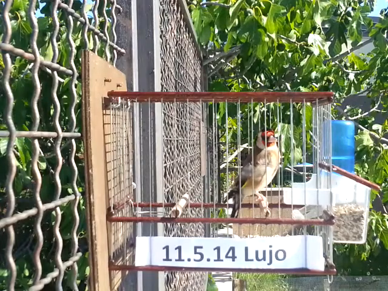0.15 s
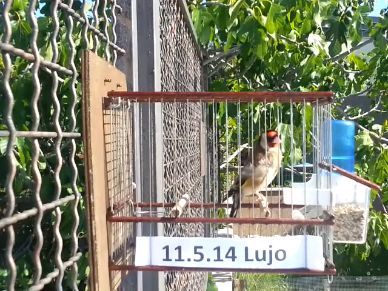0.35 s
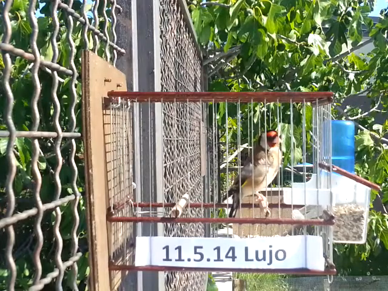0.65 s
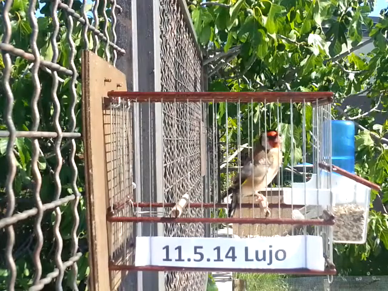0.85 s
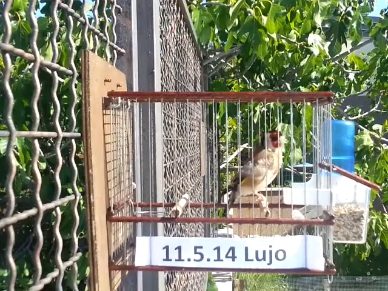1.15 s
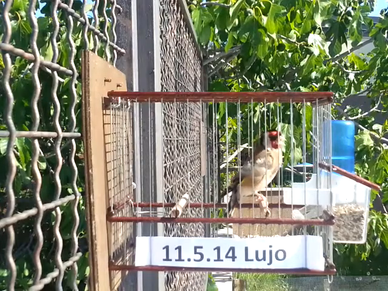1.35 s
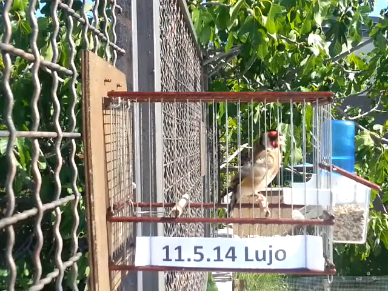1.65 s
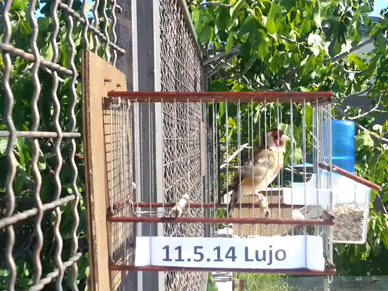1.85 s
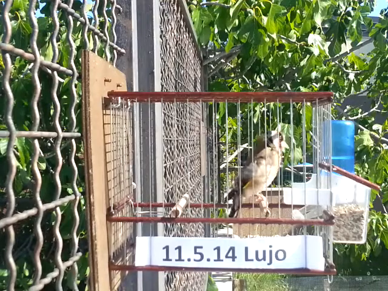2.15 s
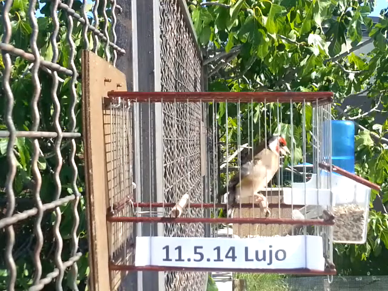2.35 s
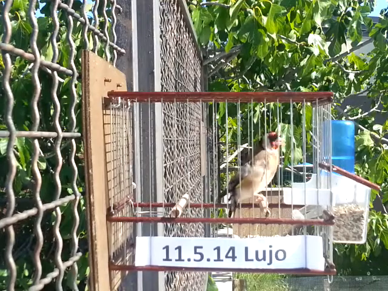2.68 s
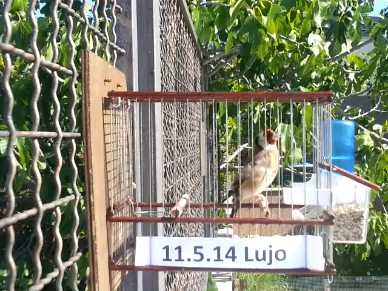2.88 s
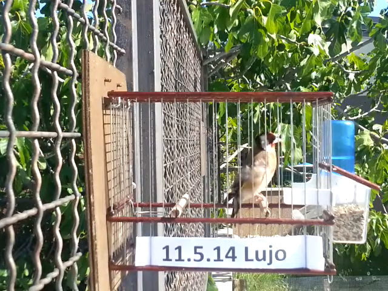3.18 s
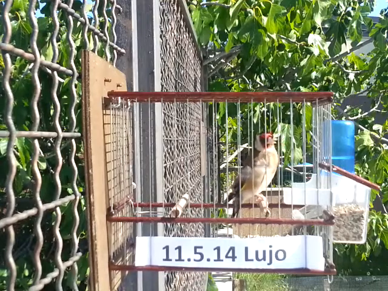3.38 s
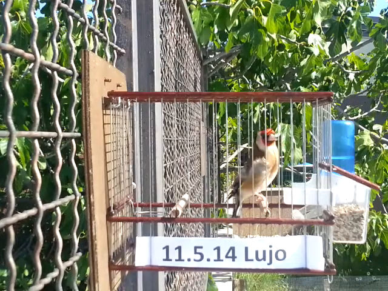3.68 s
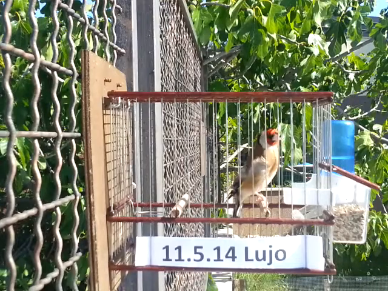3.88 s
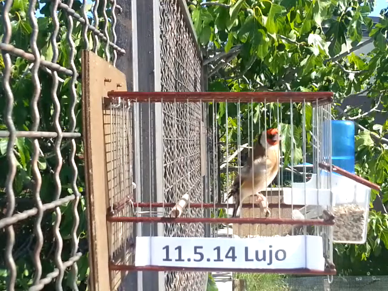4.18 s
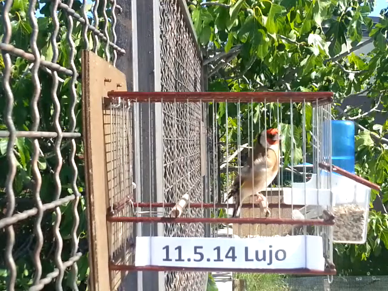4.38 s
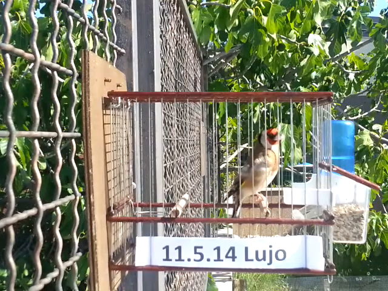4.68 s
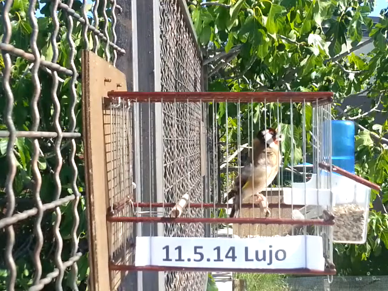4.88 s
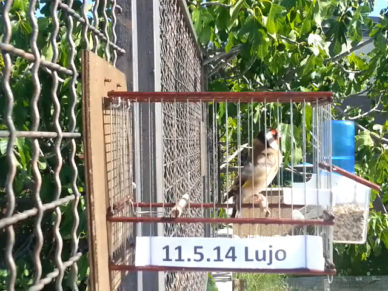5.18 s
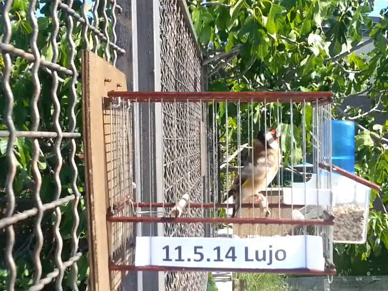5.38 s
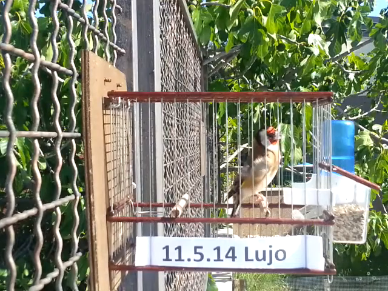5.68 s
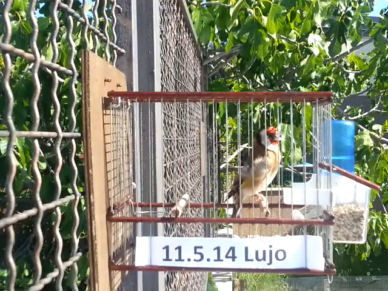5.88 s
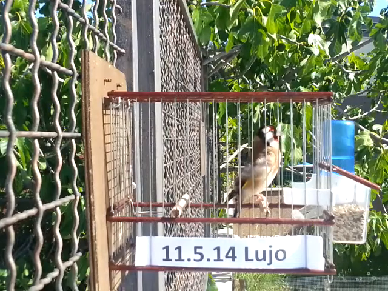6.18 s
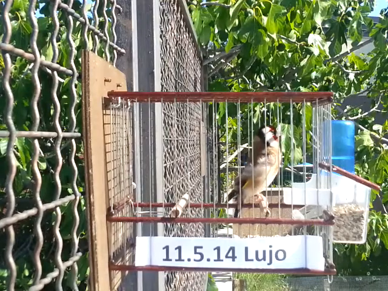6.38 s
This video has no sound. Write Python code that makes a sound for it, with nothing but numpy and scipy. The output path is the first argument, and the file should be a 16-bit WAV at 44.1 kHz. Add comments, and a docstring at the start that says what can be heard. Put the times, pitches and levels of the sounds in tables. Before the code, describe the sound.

Outdoors, quiet air with a rasping far bird call, then a loud near goldfinch bursts into clear, thin, very high notes, three motifs a second. It stops, leaving soft twitters, thin whistles and a faint throbbing trill from distant birds. A second similar phrase follows and runs to the cut. The close stereo pickup is bright, slightly hissy, with short reflections from wood, wire and fence.

```python
"""Caged goldfinch in a garden

A caged goldfinch close to a stereo microphone repeats a five-note motif in two phrases: gliding near sines
with weak overtones. Board, bars and fence return quick echoes, the yard a soft tail of decaying noise.
Further off are whistles, wheezes, a trill and chirps, made of wavering, shaken or throbbing sines, over a
low rumble and hiss made of noise bands, louder above the bass during the phrases."""
import sys
import numpy as np
from scipy import signal
from scipy.io import wavfile
from scipy.ndimage import uniform_filter1d

SR = 44100
rng = np.random.default_rng(int(sys.argv[2]) if len(sys.argv) > 2 else 0)


def int16_out(signal):
    """Quantize to a 16-bit WAV file."""
    q = np.round(np.clip(np.atleast_2d(signal).T, -1, 1) * 32767)
    wavfile.write(sys.argv[1], SR, q.astype(np.int16))


N = 288414
TIME = np.arange(N) / SR  # s

# song phrases, during which the background above the bass swells: (start [s], end [s])
PHRASES = [(.82, 2.86), (4.802, 6.6)]


def amp(db):
    """Gain of a level in dB."""
    return 10 ** (np.asarray(db) / 20)


def rms_one(x):
    """Scaled to rms 1."""
    return x / np.sqrt(np.mean(x ** 2) + 1e-20)


def sides(pan_db):
    """Left and right gains of a left-right balance in dB, total power kept."""
    ratio = amp(pan_db) ** 2
    return np.sqrt(2 * np.array([ratio, np.ones_like(ratio)]) / (1 + ratio))


def drift(per_s, size=N):
    """Random wander of rms 1: white noise through a double-pole lowpass at per_s Hz."""
    r = np.exp(-2 * np.pi * per_s / SR)
    noise = rng.standard_normal(size + SR // 2)
    wander = signal.lfilter([1], [1, -2 * r, r * r], noise)
    return rms_one(wander[SR // 2:])  # filter settled


def phase(hz):
    """Phase in radians of a varying pitch."""
    return 2 * np.pi * np.cumsum(hz) / SR


def add(out, x, s):
    """Mixes x into out from time s."""
    i = round(s * SR)
    out[:, i:i + x.shape[-1]] += x[..., :N - i]


def glide(start_ratio, settle_ms):
    """Pitch ratio that starts off its goal and closes in on it exponentially."""
    return lambda ms: 1 + (start_ratio - 1) * np.exp(-ms / settle_ms)


def arch(s, length_s, start_hz, middle_hz, end_hz, peak_db, edge_db):
    """Pitch on a parabola through three points; level swells and sinks by edge_db."""
    u = np.arange(0, 1, 1 / length_s / SR)
    hz = np.polyval(np.polyfit([0, .5, 1], [start_hz, middle_hz, end_hz], deg=2), u)
    return s, hz, peak_db + edge_db * (2 * u - 1) ** 2


def into_phrase(s):
    """Seconds since the phrase began."""
    (first, _), (second, _) = PHRASES
    return np.where(s < second - .1, s - first, s - second)


def background(level_db, patchy_db, bass_swell_db, middle_swell_db, treble_swell_db):
    """Low rumble and hiss in half-octave stereo noise bands, louder above the bass during the phrases."""
    # noise spectrum before level_db: (frequency [Hz], density [dB per Hz])
    air_table = [(25, -15), (49, -17.5), (162, -1), (900, -8), (1300, -10), (4080, -10.5), (6090, -20),
                 (13200, -17), (14700, -24.5)]
    # left-right correlation: (frequency [Hz], correlation [-1 to 1])
    likeness_table = [(60, 0.44), (370, 0.13), (2300, 0.03), (14200, 0.01002)]
    thin_line_hz, thin_line_db = 12750, -70  # faint steady hiss on one pitch

    def at_band(table, hz):
        table_hz, value = np.transpose(table)
        return np.interp(np.log(hz), np.log(table_hz), value)

    out, edges_hz = 0, 22 * 2 ** np.arange(0, 9.6, .5)
    white = rng.standard_normal((2, 2, N))
    singing = sum((TIME > start) * (TIME < end) * 1. for start, end in PHRASES)
    singing = uniform_filter1d(singing, size=6000, mode="nearest")
    flicker = [drift(6.0), drift(8.8), drift(5.1)]
    for k, (low_hz, high_hz) in enumerate(zip(edges_hz, edges_hz[1:])):
        band = signal.butter(2, [low_hz, high_hz], "band", fs=SR, output="sos")
        mid, side = signal.sosfilt(band, white[k % 2])
        hz = np.sqrt(low_hz * high_hz)
        alike = np.clip(at_band(likeness_table, hz), -1, 1)
        swell_db = bass_swell_db if hz < 230 else middle_swell_db if hz < 5000 else treble_swell_db
        gain = amp(at_band(air_table, hz) + swell_db * singing + patchy_db * flicker[k % 3])
        out = out + gain * (np.sqrt(1 + alike) * mid + np.sqrt(1 - alike) * side * [[1], [-1]])
    narrow = signal.butter(2, [thin_line_hz - 60, thin_line_hz + 60], "band", fs=SR, output="sos")
    thin = signal.sosfilt(narrow, white[0])
    return amp(level_db) * out + amp(thin_line_db) * rms_one(thin)


def wheezes(spread_hz, shakes_per_s, hiss_db):
    """A tone shaken so fast in pitch and level that it rasps, with fading breathy hiss above."""
    # calls: (time [s], length [s], centre at start [Hz], middle [Hz], end [Hz], peak level [dB])
    wheeze_table = [(.08, 0.36, 4200, 4260, 3460, -43), (3.25, 0.17, 4764, 4830, 4430, -56),
                    (3.86, 0.098, 3695, 3300, 2900, -58.5), (4.54, 0.17, 4340, 3900, 2867, -51),
                    (5.87, 0.21, 4346, 4000, 3760, -39.5)]
    out, above = np.zeros((2, N)), signal.butter(1, [6200, 9500], "band", fs=SR)
    for row in wheeze_table:
        s, hz, level_db = arch(*row, edge_db=-3.5)
        size = len(hz)
        u = np.linspace(0, 1, size)
        swell = np.sin(np.pi * u ** 0.92) ** 1.4
        beat = 0.18 + np.cos(2 * np.pi * 260 * TIME[:size])  # fast 260 Hz beating splits the tone into bands
        for side in out:
            turn = phase(hz + spread_hz * drift(250, size=size))
            rasp = amp(2.2 * drift(shakes_per_s, size=size)) * np.sin(turn) * beat
            breath = rms_one(signal.lfilter(*above, rng.standard_normal(size)))
            hiss = breath * amp(hiss_db) * (1 - u)
            add(side[None], (rms_one(rasp) + hiss) * amp(level_db) * swell, s)
    return out


def yard(x, leaves_db, leaves_t60_s, walls_db, walls_t60_s):
    """Scatter from leaves dies fast, the duller tail between walls lasts longer; sides are independent."""
    walls_top_hz = 5800  # the long way through the air takes the top
    t = TIME[:SR]
    lumps = np.clip(t / 0.016, 0, 1) * amp(3.9 * drift(55, size=SR))  # trees and sheds stand unevenly
    leaves, walls = rng.standard_normal((2, 2, SR)) * lumps
    leaves_band = signal.butter(1, [4300, 7000], "band", fs=SR)
    leaves = signal.lfilter(*leaves_band, leaves * amp(leaves_db - 60 * t / leaves_t60_s))
    walls_low = signal.butter(4, walls_top_hz, fs=SR, output="sos")
    walls = signal.sosfilt(walls_low, walls * amp(walls_db - 60 * t / walls_t60_s))
    stir = 1 + .6 * np.array([drift(70), drift(70)])  # moving leaves shake the tail
    return stir * signal.fftconvolve(x.mean(axis=0)[None], leaves + walls)[:, :N]


def whistles():
    """Thin wavering tones, some gliding, some nearly steady."""
    # short whistles: (time [s], length [s], pitch at start [Hz], middle [Hz], end [Hz],
    # peak level [dB], flutter [dB])
    short_table = [(.96, 0.12, 2360, 2180, 2050, -50, 3.8), (1.675, 0.055, 3550, 3169, 2950, -45, 4.6),
                   (2.0, 0.05, 2845, 3180, 4000, -44.5, 2), (2.65, 0.05, 2900, 3590, 4200, -43, 2),
                   (3.6, 0.15, 1637, 1585, 1525, -62, 3), (3.63, 0.18, 4575, 4510, 4579, -62, 2),
                   (3.75, 1.03, 4194, 4247, 4270, -66.5, 2.3), (4.26, 0.37, 5564, 5566, 5475, -62.5, 3),
                   (4.28, 0.23, 7480, 7500, 7580, -66, 3), (4.28, 0.24, 844, 856, 853, -61.5, 4),
                   (5.61, 0.096, 2600, 2094, 2030, -45.5, 5.43), (5.69, 0.12, 1950, 2020, 2310, -45.5, 2.6),
                   (5.8, 0.23, 1805, 1810, 1840, -50, 6.7), (6.06, 0.14, 2060, 1996, 1890, -52.5, 4.1),
                   (6.108, 0.13, 2114, 2494, 2320, -43.5, 3.8),
                   (6.24, 0.055, 1990, 2130, 1850, -44.5, 3.67), (6.27, 0.15, 2910, 3336, 3330, -45.5, 5.1),
                   (6.37, 0.11, 1915, 2375, 2420, -50, 4.2)]
    # three long whistles, a faint one that rises then sinks and two that fall;
    # each a list of points: (time [s], pitch [Hz], level [dB])
    long_table = [
        [(.15, 2330, -57), (.21, 2620, -58.5), (.46, 2290, -60.5), (.76, 2113, -64)],
        [(.72, 4266, -55), (.8, 3981, -33), (.95, 3420, -36.5), (1.1, 2797, -36.5), (1.17, 2483, -45.5),
         (1.27, 2393, -46.5), (1.36, 2057, -51.5), (1.42, 2060, -62)],
        [(4.82, 4380, -57), (4.86, 4210, -33.5), (4.93, 3840, -34), (5.0, 3165, -41.5), (5.2, 2625, -45),
         (5.33, 2255, -44.5), (5.5, 2104, -59)],
    ]
    calls = [(*arch(*row, edge_db=-7), flutter_db) for *row, flutter_db in short_table]
    for s, hz, level_db in map(np.transpose, long_table):
        t = np.arange(s[0], s[-1], 1 / SR)
        calls.append((s[0], np.interp(t, s, hz), np.interp(t, s, level_db), 2.0))
    out = np.zeros((2, N))
    for s, hz, level_db, flutter_db in calls:
        size = len(hz)
        turn = phase(hz + 6.0 * flutter_db * drift(80, size=size))
        waver_db = 0.8 * np.array([drift(25, size=size), drift(25, size=size)])
        waver_db = waver_db + flutter_db * np.minimum(drift(45, size=size), 1)
        fundamental = np.sin(turn + [[0], [rng.normal(0, 1)]])
        overtone_gain = amp(-24.0) * (hz / 4200) ** 6.0 * (hz < 4400)  # fades as the pitch falls
        tone = fundamental + overtone_gain * np.sin(2 * turn)
        ends = signal.windows.tukey(size, .1)
        add(out, tone * np.sqrt(2) * amp(level_db + waver_db) * ends, s)
    return out


def notes(rows, tune, attack_ms, attack_power, release_ms, release_power, second_db, lead_rad,
          overtone_lead_rad, swing_db, opens_db=-40, third_db=-90, tremor_hz=34, breath_db=-29.0,
          overtone_power=.61):
    """One note kind: a near sine from the syrinx swells, holds and dies, with overtones, breath and tremor."""
    out = np.zeros((2, N))
    lead, overtone_lead = np.array([[lead_rad], [0]]), np.array([[overtone_lead_rad], [0]])  # left vs right
    for s, peak_db, hz, pan_db, hold_ms, stretch in zip(*np.broadcast_arrays(*rows)):
        length_ms = attack_ms + hold_ms + release_ms
        ms = np.arange(-2, length_ms + 2, 1000 / SR / stretch)  # note time before stretching
        size = len(ms)
        pitch_hz = hz * tune(ms) + tremor_hz * drift(270, size=size)
        turn = phase(uniform_filter1d(pitch_hz, size=40))
        attack = np.clip(ms / attack_ms, 0, 1) ** attack_power
        attack = np.maximum(attack, amp(opens_db) * (ms > 0))  # the voice sets in with a small step
        release = 1 - np.clip((ms - attack_ms - hold_ms) / release_ms, 0, 1) ** release_power
        swell = uniform_filter1d(attack * release, size=60).clip(0)
        breath = amp(breath_db) * np.array([drift(900, size=size), drift(650, size=size)])
        balance = sides(pan_db + swing_db * (ms / length_ms - .5))
        tone = (1 + breath) * np.sin(turn + lead) * balance
        second = amp(second_db) * np.sin(2 * turn + overtone_lead)
        third = amp(third_db) * np.sin(3 * turn + overtone_lead)
        hiss = amp(-44.0) * rng.standard_normal((2, size))
        note = (tone + hiss) * swell + (second + third) * swell ** overtone_power
        add(out, amp(peak_db) * note, s + ms[0] * stretch / 1000)
    return out


def goldfinch():
    """The motif: rise, then a quick run of soft rise, chip and dip, then pipe; the singer tires."""
    # rising note that opens each motif: (time [s], peak level [dB], left-right balance [dB])
    rise_table = [(0.8285, -4, 6.5), (1.154, -1, 8), (1.483, -0.5, 7), (1.817, -1.5, 7), (2.1584, -5, 10),
                  (2.5098, -3, 7.5), (4.7933, -4, 6.5), (5.1213, -3, 6.5), (5.4594, -3, 7),
                  (5.796, 0.15, 7), (6.135, -1, 10.5), (6.4946, -3.5, 8.5)]
    # quick runs: (chip time [s], chip peak [dB], dip peak [dB], dip pitch [Hz], dip hold [ms],
    # dip left-right balance [dB])
    run_table = [(0.9396, -7, -3.5, 6805, 5, -5.5), (1.2696, -6, -3, 7000, 14.2, -7),
                 (1.5975, -5.5, -3.5, 6914, 16, -6.5), (1.9357, -6, -5, 6980, 15.4, -8),
                 (2.2833, -8.5, -5.5, 6906, 13.7, -3), (2.6351, -5, -3, 6686, 12.5, 5),
                 (4.905, -9.5, -6.5, 7085, 11.5, -7.5), (5.2402, -8, -5, 6990, 15, -6.5),
                 (5.574, -8, -4.5, 6785, 14, -5), (5.9144, -6.5, -2.5, 6820, 13.2, -3),
                 (6.2563, -8, -6, 6850, 14.4, -5.5)]
    # steady closing note: (time [s], peak level [dB], pitch [Hz], left-right balance [dB], hold [ms])
    pipe_table = [(1.0545, -3, 5550, 5, 2.3), (1.3833, -3, 5590, 8, 3), (1.7124, -3.5, 5512, 0.8, 3.5),
                  (2.051, -5, 5510, 4, 4.5), (2.403, -5.5, 5520, 6.5, 4.4), (2.759, -5, 5458, 8, 2.8),
                  (5.02, -4, 5585, 6, 0.58), (5.3561, -8, 5537, 2.5, 5.9), (5.6918, -4, 5536, 4.5, 6.2),
                  (6.0321, -4.5, 5444, 2, 7.1), (6.376, -7, 5473, 5, 6.3)]
    # tune of the dip, cut short by a short note: (time [ms], pitch ratio [1])
    dip_tune = [(0.5, 1.05), (2.55, 1.098), (4.5, 1.035), (11.5, 1.0), (18, 0.965), (23.5, 1.01),
                (27, 1.075), (30, 1.085)]
    rise_hz, soft_rise_hz, chip_hz = 4285, 3520, 5327  # glide goals at phrase start
    soft_before_chip_ms, dip_after_chip_ms = 35.2, 32.2  # gaps at phrase start
    gaps_grow_per_s, rise_grows_per_s, pitch_sag_per_s = 0.016, 0.025, 0.02  # shares per second of phrase

    rise_s, rise_db, rise_pan_db = np.transpose(rise_table)
    chip_s, chip_db, dip_db, dip_hz, dip_hold_ms, dip_pan_db = np.transpose(run_table)
    pipe_s, pipe_db, pipe_hz, pipe_pan_db, pipe_hold_ms = np.transpose(pipe_table)
    s_per_gap_ms = (1 + gaps_grow_per_s * into_phrase(chip_s)) / 1000
    rise_sag, run_sag = (1 - pitch_sag_per_s * into_phrase(s) for s in (rise_s, chip_s))
    rise_stretch = 1 + rise_grows_per_s * into_phrase(rise_s)

    # rows: (s, peak dB, Hz, left-right dB, hold ms, stretch)
    rises = notes((rise_s, rise_db, rise_hz * rise_sag, rise_pan_db, .6, rise_stretch),
                  glide(0.73, settle_ms=18.1), opens_db=-23, breath_db=-36.5,
                  attack_ms=12.9, attack_power=0.9, release_ms=17.5, release_power=0.64,
                  second_db=-35.0, third_db=-41.5, lead_rad=0.44, overtone_lead_rad=0.63, swing_db=0.5)
    soft_s = chip_s - soft_before_chip_ms * s_per_gap_ms
    soft_rises = notes((soft_s, -20, soft_rise_hz * run_sag, 9.5, .8, 1),
                       glide(0.63, settle_ms=21), overtone_power=1.2,
                       attack_ms=9.5, attack_power=0.66, release_ms=16, release_power=0.72,
                       second_db=-17.5, third_db=-32.0, lead_rad=0.89, overtone_lead_rad=.4, swing_db=-5.0)
    chips = notes((chip_s, chip_db, chip_hz * run_sag, 9.5, 5.0, 1),
                  glide(0.91, settle_ms=4.0), tremor_hz=110, breath_db=-29.0, opens_db=-18.5,
                  attack_ms=5.8, attack_power=0.5, release_ms=10.5, release_power=0.82,
                  second_db=-28.0, lead_rad=-0.23, overtone_lead_rad=1.79, swing_db=-4.5)
    # the chip trails off in a rasp
    rasps = notes((chip_s + .0165, chip_db - 20.0, chip_hz * run_sag, 9.5, 6, 1),
                  glide(0.98, settle_ms=1), tremor_hz=219, breath_db=-6.5,
                  attack_ms=1.8, attack_power=0.96, release_ms=7, release_power=1.5,
                  second_db=-32.5, lead_rad=-0.23, overtone_lead_rad=1.9, swing_db=1.5)
    dip_s = chip_s + dip_after_chip_ms * s_per_gap_ms
    dips = notes((dip_s, dip_db, dip_hz, dip_pan_db, dip_hold_ms, 1),
                 lambda ms: np.interp(ms, *np.transpose(dip_tune)), tremor_hz=60, breath_db=-36.5,
                 attack_ms=8, attack_power=1.0, release_ms=11.0, release_power=0.97,
                 second_db=-27.5, lead_rad=-.1, overtone_lead_rad=1.7, swing_db=-1.0)
    pipes = notes((pipe_s, pipe_db, pipe_hz, pipe_pan_db, pipe_hold_ms, 1),
                  glide(1.09, settle_ms=7.2), opens_db=-21.0,
                  attack_ms=17.8, attack_power=2.0, release_ms=18.5, release_power=2.1,
                  second_db=-27, lead_rad=-0.18, overtone_lead_rad=1.2, swing_db=-12)
    return rises + soft_rises + chips + rasps + dips + pipes


def near_echoes(x):
    """A few hard surfaces within metres send the song back."""
    # echoes from board, bars and fence: (delay [ms], left level [dB], right level [dB])
    echo_table = [(3.1, -20, -22.5), (6.3, -20, -16.5), (10.5, -22.5, -21), (14.7, -28, -29.5)]
    out = np.zeros((2, N))
    dulled = signal.lfilter(*signal.butter(2, 5500, fs=SR), x.mean(axis=0))  # wood and wire dull the top
    for ms, left_db, right_db in echo_table:
        add(out, amp([[left_db], [right_db]]) * dulled, ms / 1000)
    return out


def chirps(twitter_ms, glide_hz, arch_hz):
    """Short arched notes of small birds: listed far chirps, and a faint random twitter during the song."""
    # far chirps: (time [s], length [s], pitch at start [Hz], middle [Hz], end [Hz], peak level [dB])
    chirp_table = [(1.455, 0.038, 3740, 4020, 3787, -47), (2.865, 0.061, 3550, 3600, 2890, -48.5),
                   (2.983, 0.017, 3835, 4247, 4430, -50.5), (2.993, 0.021, 3050, 3234, 3060, -50.5),
                   (3.03, 0.061, 2733, 3223, 3580, -55.5), (3.07, 0.022, 2660, 2870, 2740, -49),
                   (3.188, 0.024, 3680, 3902, 4274, -48.5), (3.21, 0.033, 3140, 2823, 3120, -56.5),
                   (3.21, 0.0196, 4250, 3920, 4300, -48), (3.23, 0.019, 4480, 4590, 4570, -53),
                   (3.347, 0.021, 2901, 3550, 3210, -42), (5.93, 0.066, 4800, 3170, 4700, -45),
                   (6.35, .025, 3440, 3075, 2886, -38)]
    twitter = []
    for at, pitch, loud, slope in rng.random((160, 4)):
        s, hz, half_glide_hz = at * N / SR, 2600 + 2400 * pitch, glide_hz * (slope - .25)
        if any(start < s < end for start, end in PHRASES):
            twitter.append((s, twitter_ms / 1000, hz - half_glide_hz, hz + arch_hz, hz + half_glide_hz,
                            -57 + 11 * loud ** 2))
    out = np.zeros((2, N))
    for row in chirp_table + twitter:
        s, hz, level_db = arch(*row, edge_db=-9.0)
        size = len(hz)
        turn = phase(hz + 35 * drift(150, size=size))
        level = amp(level_db + 2.2 * drift(120, size=size)) * signal.windows.tukey(size, .3)
        add(out, level * np.sin(turn + [[0], [rng.normal(0, 1)]]), s)
    return out


def trill():
    """A far sine on one pitch, throbbing about twenty times a second."""
    # level before flutter: (time [s], level [dB])
    level_table = [(3.485, -58.5), (4.08, -66), (4.3, -61), (4.75, -66.5), (5.05, -53), (5.201, -63)]
    pitch_hz, throbs_per_s = 2210, 19
    s, level_db = np.transpose(level_table)
    level = amp(np.interp(TIME, s, level_db, left=-120, right=-120) + 2.5 * drift(5.0))
    throb = 1 + .5 * np.sin(2 * np.pi * throbs_per_s * TIME + 2.5 * drift(5.0))
    return level * throb * np.sin(2 * np.pi * pitch_hz * TIME) * sides(1.5)[:, None]


def scene():
    """The singer with its echoes, the further sounds wetter, and the background."""
    bird = goldfinch()
    small = chirps(twitter_ms=22.0, glide_hz=599, arch_hz=310)
    others = whistles() + wheezes(spread_hz=190, shakes_per_s=260, hiss_db=-7.5) + trill()
    tail = yard(bird + small + amp(15.0) * others,
                leaves_db=-46.5, leaves_t60_s=0.3, walls_db=-58.0, walls_t60_s=.58)
    air = background(level_db=-42, patchy_db=2.0,
                     bass_swell_db=0.0, middle_swell_db=4.5, treble_swell_db=5.5)
    return bird + near_echoes(bird) + small + others + tail + air


def record(dry):
    """Peaks clip at full scale, then a steep lowpass cuts the top."""
    cutoff_hz = 14750
    steep = signal.ellip(9, .5, 60, cutoff_hz, fs=SR, output="sos")
    return signal.sosfilt(steep, np.clip(dry, -1, 1))


dry = scene()
out = record(dry)
int16_out(out)
```